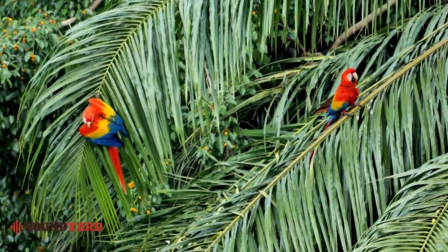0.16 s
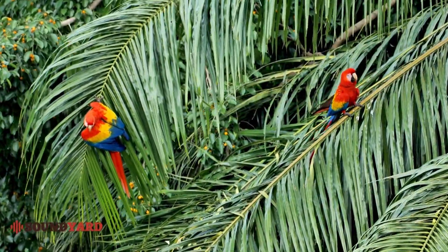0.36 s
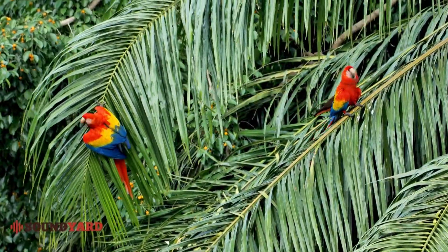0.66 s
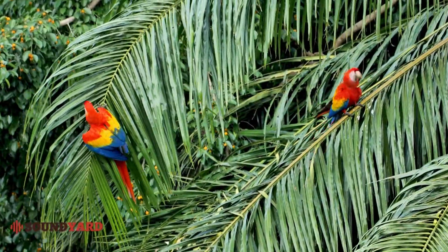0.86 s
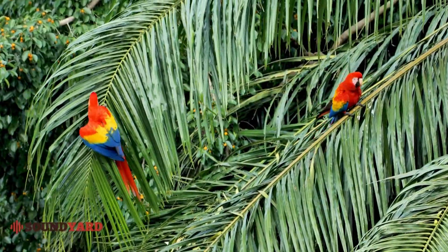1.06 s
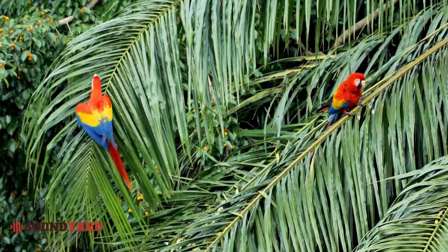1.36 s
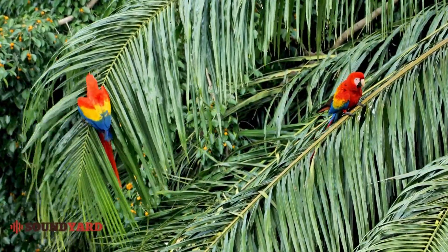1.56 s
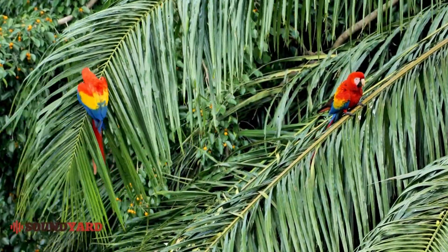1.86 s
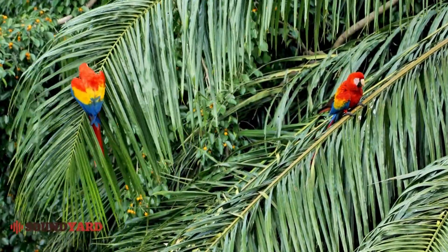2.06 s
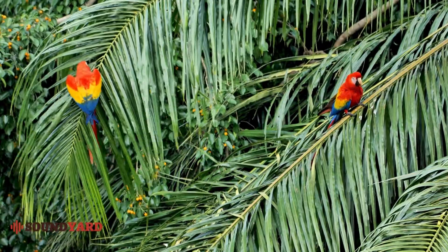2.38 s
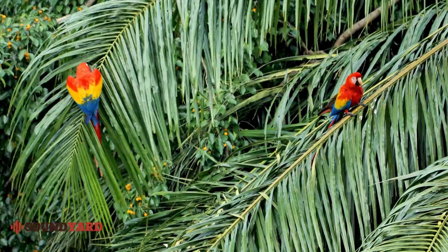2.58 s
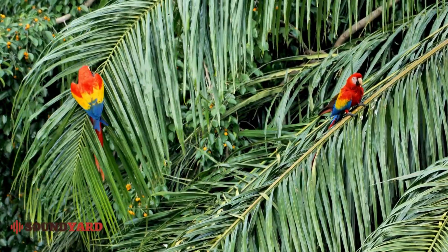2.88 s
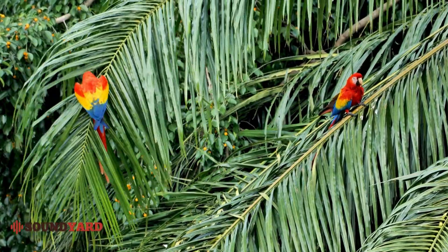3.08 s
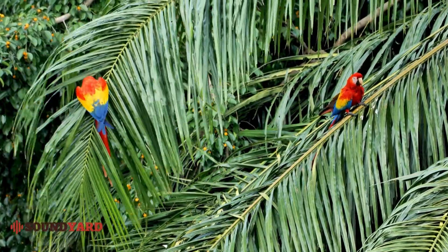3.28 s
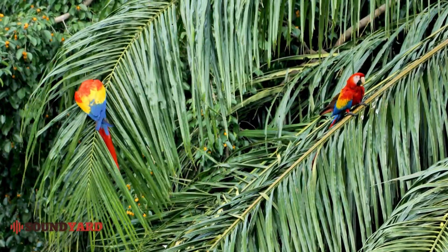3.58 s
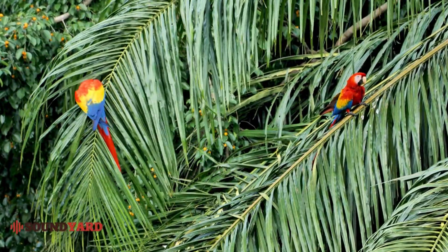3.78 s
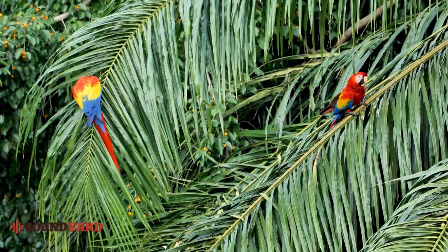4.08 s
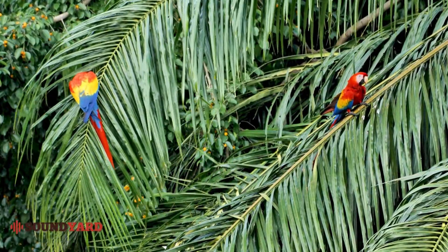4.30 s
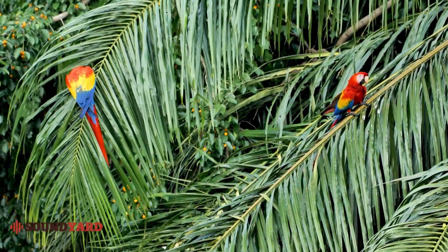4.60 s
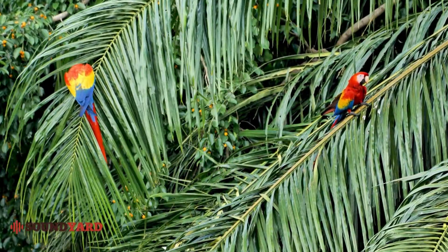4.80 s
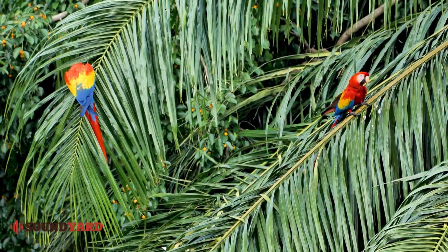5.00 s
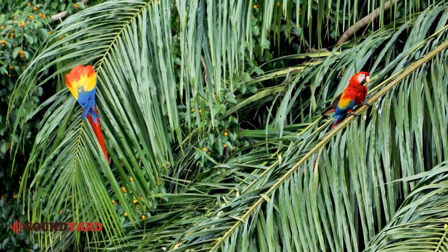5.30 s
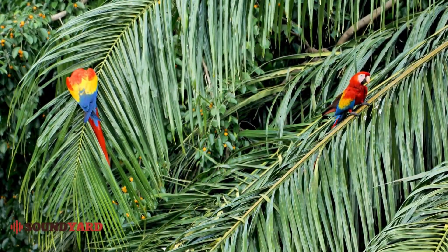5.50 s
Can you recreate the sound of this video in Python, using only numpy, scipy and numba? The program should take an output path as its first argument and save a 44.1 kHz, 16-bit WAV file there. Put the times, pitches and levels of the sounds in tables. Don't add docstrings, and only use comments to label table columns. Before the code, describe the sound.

Two macaws in a palm crown scream harsh, raspy squawks with creaky notes between, over forest air, rustling fronds and distant parakeet chatter.

```python
import sys
import numpy as np
from scipy import signal
from scipy.io import wavfile
from scipy.ndimage import uniform_filter1d, map_coordinates
from numba import njit

SR = 44100
rng = np.random.default_rng(int(sys.argv[2]) if len(sys.argv) > 2 else 0)


def store_wav(level_fs):
    pcm = np.round(np.clip(np.atleast_2d(level_fs), -1, 1) * 32767)
    wavfile.write(sys.argv[1], SR, pcm.T.astype(np.int16))


def field_ratio(decibels):
    return 10 ** (np.asarray(decibels, dtype=float) / 20)


N = 249165
LEFT_ONLY_DB = 6


def level(x, db):
    return x * field_ratio(db) / np.sqrt(np.mean(x ** 2))


def add(out, start, x):
    out[start:start + len(x)] += x[:N - start]


@njit
def svf(x, hz, width_hz):
    y, b, l = np.empty(len(x)), 0., 0.
    for i in range(len(x)):
        g, k = np.tan(np.pi * hz[i] / SR), width_hz / hz[i]
        v = (b + g * (x[i] - l)) / (1 + g * (g + k))
        b, l, y[i] = 2 * v - b, l + 2 * g * v, k * v
    return y


def band(x, hz, width_hz):
    return svf(x, np.clip(hz * np.ones(len(x)), 20, .45 * SR), max(float(width_hz), 10.))


def band2(x, hz, width_hz):
    return band(band(x, hz, width_hz), hz, width_hz)


def walk(rate_hz, size):
    k = max(int(SR / rate_hz), 1)
    held = np.repeat(rng.standard_normal(size // k + 1), k)
    return 1.3 * uniform_filter1d(uniform_filter1d(held, k), k)[:size]


def swells(peak_s, db, rise_db_per_s, fall_db_per_s):
    coarse = np.arange(0, N, 32)
    late_s = coarse / SR - np.reshape(peak_s, (-1, 1))
    slope = np.where(late_s < 0, np.reshape(rise_db_per_s, (-1, 1)), -np.reshape(fall_db_per_s, (-1, 1)))
    power = np.sum(field_ratio(np.reshape(db, (-1, 1)) + slope * late_s) ** 2, axis=0)
    return np.interp(np.arange(N), coarse, np.sqrt(power))


def effort(length_s, attack_s, release_s):
    t = np.arange(int(length_s * SR)) / SR
    return t, np.clip(np.minimum(t / attack_s, (length_s - t) / release_s), 0, 1)


@njit
def fire(hz, stretch, size):
    pulses, p, k = np.zeros(len(hz) + 1), .9, 0
    for i in range(len(hz)):
        step = hz[i] * stretch[k] / SR
        p += step
        if p >= 1:
            p, k = p - 1, k + 1
            pulses[i] += size[k] * p / step
            pulses[i + 1] += size[k] * (1 - p / step)
    return pulses[:-1]


def syrinx(hz, jitter, scatter_db):
    chance = rng.standard_normal((len(hz) // 8, 2)).T
    stretch = np.exp(np.clip(jitter * chance[0], -.7, .7))
    return fire(hz, stretch, field_ratio(scatter_db * np.clip(1.1 * chance[1], -3, 1.3)))


# f/Hz, density/dB per Hz
FOREST_AIR = [(59, -37), (100, -11.5), (347, -3), (420, 2), (477, -4), (1340, -6.5), (1800, -9), (2180, -9),
              (5400, -13), (8770, -19.5), (15500, -18.5)]
FOREST_DB = -46.5


def forest():
    out, swell = 0, walk(2.107, size=N)
    at_hz, per_hz_db = np.transpose(FOREST_AIR)
    for hz in 120 * 2 ** np.arange(0, 7.1, .5):
        db = np.interp(np.log(hz), np.log(at_hz), per_hz_db) + .8 * swell + 1.5 * walk(9, size=N)
        out = out + field_ratio(db) * band2(rng.standard_normal(N), hz, hz / 2)
    return level(out, FOREST_DB)


# peak t/s, level/dB
GUSTS = [(0., -54), (.31, -58.5), (.6, -64), (.9, -66), (1.18, -62), (1.451, -77), (1.9, -74), (3.01, -68),
         (3.3, -70), (3.6, -66.5), (3.81, -69), (4.17, -64), (4.4, -69.5), (4.92, -65.5), (5.16, -62),
         (5.38, -61.5)]
GUST_RISE_DB_PER_S, GUST_FALL_DB_PER_S, CALM_DB = 109.5, 94.5, -77.5


def wind():
    rumble = band(band(rng.standard_normal(N), 29.7, 57), 35, 69)
    gusts = swells(*np.transpose(GUSTS), GUST_RISE_DB_PER_S, GUST_FALL_DB_PER_S) + field_ratio(CALM_DB)
    return level(rumble, 0) * gusts * field_ratio(LEFT_ONLY_DB + 2 * walk(12, size=N))


# peak t/s, level/dB, centre f/Hz
SCREECHES = [(0., -35, 4650), (.162, -41.5, 4390), (.198, -42, 4380), (.342, -38, 4280), (.53, -42, 4480),
             (.56, -46, 4200), (.714, -38.5, 4430), (.79, -50.5, 4050), (2.25, -45.5, 4200),
             (2.335, -41.5, 4010), (2.39, -45.5, 4110), (2.44, -43, 4450), (2.491, -47, 4590),
             (2.625, -39, 4370), (2.77, -54, 4560), (2.88, -57.5, 4670), (3.15, -57.5, 3800)]
# start t/s, length/s, from f/Hz, to f/Hz, level/dB
CLEAR_NOTES = [(.001, .025, 5180, 5180, -36), (.002, .03, 1480, 1300, -51), (.003, .03, 2960, 2600, -52),
               (.135, .03, 2300, 2200, -55), (.15, .03, 4700, 4500, -45), (.165, .035, 1700, 1380, -52),
               (.17, .03, 3150, 2700, -51), (.32, .05, 4900, 5300, -43), (.33, .04, 4000, 3900, -44),
               (2.262, .04, 4950, 4700, -46), (2.28, .045, 4000, 4250, -45), (2.327, .04, 3650, 3850, -39),
               (2.375, .08, 3900, 4150, -42), (2.36, .075, 3000, 3120, -47), (2.42, .05, 5000, 4900, -47),
               (2.745, .032, 1680, 1730, -47)]
CHATTER_RISE_DB_PER_S, CHATTER_FALL_DB_PER_S = 282.5, 166


def parakeets():
    peak_s, peak_db, peak_hz = np.transpose(SCREECHES)
    centre_hz = np.interp(np.arange(N) / SR, peak_s, peak_hz)
    source = syrinx(1100 * (1 + .12 * walk(30, size=N)), jitter=.06, scatter_db=2)
    source = source * field_ratio(1.42 * walk(118.2, size=N))
    out = level(band(band2(source, centre_hz, 2770), centre_hz, 3800), -1.55)
    out = out * swells(peak_s, peak_db, CHATTER_RISE_DB_PER_S, CHATTER_FALL_DB_PER_S)
    for start_s, length_s, from_hz, to_hz, db in CLEAR_NOTES:
        size = int(length_s * SR)
        hz = np.linspace(from_hz, to_hz, size) * (1 + .008 * walk(150, size=size))
        swell = np.hanning(size) ** .3 * field_ratio(db - 2 + 2.5 * walk(80, size=size))
        add(out, int(start_s * SR), swell * np.sin(2 * np.pi * np.cumsum(hz) / SR))
    return out


# t/s, peak level/dB, f/Hz, width/Hz
FROND_TICKS = [(0.2912, -16, 1340, 1790), (.31, -21.5, 1270, 1500), (0.434, -32, 2600, 250),
               (0.498, -37, 2380, 222), (0.573, -42.5, 2303, 250), (0.64, -35, 2280, 299),
               (3.5504, -27.5, 4000, 7000), (3.749, -34, 8400, 1500), (3.88, -34, 5000, 1811),
               (4.165, -39, 110, 120), (5.373, -33, 91, 151), (.756, -17.5, 1500, 1500),
               (4.23, -30.5, 1450, 900), (5.078, -16, 2184, 3000), (4.343, -23.5, 2500, 4000)]
# peak t/s, level/dB, rise/dB per s, fall/dB per s
BRUSHES = [
    (.291, -43, 1500, 500),
    (0.334, -42, 181.5, 150),
    (.435, -49.5, 900, 600.5),
    (.64, -51.5, 299.5, 45.5),
    (2.605, -54, 899, 57.5),
    (3.42, -54.5, 120.5, 199.5),
]


def fronds():
    out = np.zeros(N)
    for start_s, db, hz, width_hz in FROND_TICKS:
        tick = band2(np.arange(2000) == 0, hz, width_hz)
        add(out, int(start_s * SR), field_ratio(db - LEFT_ONLY_DB) * tick / np.abs(tick).max())
    crackle = rng.standard_normal(N) * field_ratio(0.61 * rng.exponential(size=N))
    crackle = band(band(crackle, 2100, 1990), 1420, 2400)
    return out + level(crackle, 0) * swells(*np.transpose(BRUSHES))


# start t/s, length/s, attack/s, level/dB, drift over the call/dB
SQUAWK_CALLS = [
    (.748, 0.5807, 0.0578, -18, -2.5),
    (1.51, 0.586, 0.034, -22, -1.5),
    (4.328, 0.625, 0.0445, -14, -0.5),
    (5.23, 0.58, 0.0364, -17.5, -2.5),
]
# opening punch/dB, brightness/dB, top edge/dB
COLOURS = [
    (-9.5, 0, 1),
    (8, 3.5, 2.56),
    (-2, -0.73, 11.5),
    (0.76, 0.24, 0.68),
]
# f/Hz, width/Hz, level/dB
THROATS = [
    [(520.7, 120, -17.5), (1091.4, 483, -12.5), (1438, 287, -1.5), (2032, 419, -2.5), (2803, 426, -5),
     (3458, 480, -10), (3955, 248, -7.5), (4369, 531, -11.5), (5572, 890, -21), (7303, 1190, -29),
     (9365, 560, -38.5), (10460, 1080, -40.5), (12540, 2050, -44.5)],
    [(524.3, 70.6, -18), (1133.7, 358, -9), (1508.4, 208.6, -2), (2042, 350, -0.5), (2931, 610, -3.5),
     (3536, 350, -15), (4007, 670, -11), (5193, 770, -21), (6130, 457, -24), (7124, 385, -27.5),
     (8170, 880, -32), (10150, 990, -37.5), (11930, 840, -40.5)],
    [(525.6, 248, -14), (1152.7, 339.5, -6.5), (1607, 379, -0.5), (2175, 257, -2), (2880, 597, 0),
     (3605, 680, -11), (3926, 548, -1), (5000, 616, -19.5), (5477, 888, -12.5), (7860, 1210, -37.5),
     (8574, 940, -31.5), (10476, 2430, -40), (13800, 6600, -41.5)],
    [(552, 252, -16), (1104, 420, -10), (1542, 365, 2.5), (2220, 259, 2), (2600, 483, -2), (3177, 520, -2),
     (4066, 536, -3), (5000, 504, -12), (5735, 950, -12.5), (7635, 390, -25), (8524, 666, -24),
     (10270, 2200, -34), (13300, 6500, -35.5)],]
# delay/s, gain
FROND_ECHOES = [
    (.0099, 0.48),
    (0.0086, 0.426),
    (0.0082, 0.357),
    (.0074, 0.328),
]
# t/s, spread/s, level/dB
RASP_CRACKS = [
    (5.268, 0.0152, 6.5),
    (5.379, 0.0288, 10),
]
SYRINX_HZ, ATTACK_CURVE, RELEASE_S, PUNCH_S = 932.1, 1.16, 0.0482, 0.0757
TONGUE_DROP, SLACK_DULL_DB, BRIGHTEN_DB_PER_S = 0.1435, -5, 5.5
SLACK_TOP_DB, TOP_OPENS_S = -4, 0.0425


def squawk_source(size):
    source = syrinx(SYRINX_HZ * (1 + .05 * walk(40, size=size)), jitter=.17, scatter_db=2.8)
    source = level(source - source.mean(), 0) + field_ratio(-7) * rng.standard_normal(size)
    flutter = walk(200, size=size)
    return source * field_ratio(2.4 * np.clip(flutter - uniform_filter1d(flutter, size=1500), -3, 1))


def squawks():
    out = np.zeros(N)
    rows = zip(SQUAWK_CALLS, COLOURS, THROATS, FROND_ECHOES)
    for call, (punch_db, bright_db, top_db), throat, (lag_s, share) in rows:
        start_s, length_s, attack_s, db, drift_db = call
        t, push = effort(length_s, attack_s, RELEASE_S)
        size, start = len(t), int(start_s * SR)
        loud_db = db + drift_db * t / length_s + punch_db * np.exp(-t / PUNCH_S)
        loud = np.where(t < attack_s, push ** ATTACK_CURVE, push) * field_ratio(loud_db)
        tongue = 1 - TONGUE_DROP * (1 - push)
        sharpen_db = BRIGHTEN_DB_PER_S * t + SLACK_DULL_DB * (1 - push)
        rasp_db = sum(d * np.exp(-((start_s + t - at_s) / spread_s) ** 2)
                      for at_s, spread_s, d in RASP_CRACKS)
        opening_db = SLACK_TOP_DB * np.exp(-(t / TOP_OPENS_S) ** 2)
        source = squawk_source(size)
        voice = 0
        for k, (hz, width_hz, mode_db) in enumerate(throat):
            centre_hz = hz * (tongue if hz < 2400 else 1) + 45 * walk(16.6, size=size)
            mode = band2(source, centre_hz, 1.3 * width_hz)
            if hz > 6600:
                colour_db = sharpen_db + top_db + rasp_db + opening_db
            elif hz > 3300:
                colour_db = sharpen_db + bright_db
            else:
                colour_db = 0
            mode_gain = field_ratio(mode_db + colour_db + 0.98 * walk(12.57, size=size))
            voice = voice + (-1) ** k * mode_gain * mode
        voice = level(voice, 0) * loud
        add(out, start, voice)
        add(out, start + int(lag_s * SR), share * voice)
    return out


# start t/s, length/s, pulse rate f/Hz, first level/dB, last level/dB
CREAK_CALLS = [
    (1.327, 0.1925, 195.5, -31, -35),
    (4.228, 0.1125, 184.7, -46, -30.5),
    (4.945, 0.1184, 199.7, -32.5, -34.5),
    (5.072, 0.1752, 180.3, -30, -32),
]
# period spread, strength scatter/dB, second resonance f/Hz, its level/dB
MANNERS = [
    (.06, 1.8, 2400, -14),
    (.25, 3, 2400, -15),
    (.09, 2.5, 2450, -13),
    (.03, 1.5, 2450, -12),
]
# first f/Hz, last f/Hz
BEAKS_HZ = [
    (1400, 1583),
    (1450, 1473),
    (1450, 1462),
    (1600, 1558),
]
# f/Hz, width/Hz, level/dB
CREAK_MODES = [(3540, 880, -15.5), (4200, 110, -11.5), (4684, 1210, -17), (5970, 830, -35),
               (1045, 783, -19)]
CREAK_ATTACK_S, CREAK_RELEASE_S, CREAK_SAG_HZ_PER_S = 0.0083, 0.0345, 130
CREAK_CLICK_DB, CREAK_CHEST_DB, CREAK_AIR_DB = -22, -25.5, -14


def creaks():
    out = np.zeros(N)
    for call, (first_hz, last_hz), manner in zip(CREAK_CALLS, BEAKS_HZ, MANNERS):
        start_s, length_s, rate_hz, from_db, to_db = call
        jitter, scatter_db, second_hz, second_db = manner
        t, push = effort(length_s, CREAK_ATTACK_S, CREAK_RELEASE_S)
        size = len(t)
        source = level(syrinx(rate_hz - CREAK_SAG_HZ_PER_S * t, jitter, scatter_db), 0)
        source = source + field_ratio(-6) * rng.standard_normal(size)
        beak_hz = first_hz + (last_hz - first_hz) * np.sqrt(t / length_s)
        beak_hz = beak_hz * (1 + 0.0176 * walk(29.6, size=size))
        first = band(band(source, beak_hz, 140), beak_hz, 600)
        modes = [(second_hz, 400, second_db)] + CREAK_MODES
        upper = sum((-1) ** (k + 1) * field_ratio(db) * band2(source, hz, width_hz)
                    for k, (hz, width_hz, db) in enumerate(modes))
        upper = field_ratio(3.0) * band2(upper, 2890, 5000)
        click = field_ratio(CREAK_CLICK_DB) * band(band(source, beak_hz, 950), beak_hz, 1560)
        chest = field_ratio(CREAK_CHEST_DB) * band2(source, 450, 257)
        air = level(band(band(rng.standard_normal(size), 3530, 3000), 3950, 6400), CREAK_AIR_DB)
        voice = (first + upper + click + chest) / np.std(first) + air
        add(out, int(start_s * SR), voice * push * field_ratio(from_db + (to_db - from_db) * t / length_s))
    return out


LEAVES_T60_S, LEAVES_DB = .05, -13


def leaves(x):
    t = np.arange(int(LEAVES_T60_S * SR)) / SR
    scatter = rng.standard_normal(len(t)) * field_ratio(-60 * t / LEAVES_T60_S) * (t > .001)
    scatter = scatter * field_ratio(LEAVES_DB) / np.sqrt(np.sum(scatter ** 2))
    return x + signal.fftconvolve(x, scatter)[:N]


@njit
def trees(x, lags, gain, damp):
    line, soft, out = np.zeros((8, 8192)), np.zeros(8), np.zeros(len(x))
    for i in range(len(x)):
        total = 0.
        for k in range(8):
            soft[k] += (1 - damp) * (gain[k] * line[k, (i - lags[k]) & 8191] - soft[k])
            total += soft[k]
            out[i] += soft[k] * (1 - 2 * (k % 2))
        for k in range(8):
            line[k, i & 8191] = x[i] + soft[k] - total / 4
    return out


GAIN_START_DB, GAIN_REST_DB, GAIN_DB_PER_S_PER_DB = -4.5, -27, 0.3684


def gain(heard):
    heard_db = 10 * np.log10(uniform_filter1d(heard ** 2, 4096) + 1e-7)
    creep_db = GAIN_START_DB + np.cumsum(GAIN_DB_PER_S_PER_DB * (GAIN_REST_DB - heard_db)) / SR
    return field_ratio(creep_db - np.maximum(np.maximum.accumulate(creep_db), 0))


ECHO_T60_S, ECHO_DAMP, ECHO_DB, SWAY_S = 0.821, 0.113, -15.5, .0006


def scene():
    air, buffeting = forest(), wind()
    far = leaves(parakeets())
    near = leaves(fronds() + squawks() + creaks())
    lags = np.array([1031, 1523, 2129, 2797, 3571, 4409, 5347, 6421])
    sent = band(band(near, 3100, 9560), 3100, 10000) + field_ratio(4.5) * far
    echo = trees(sent, lags, field_ratio(-60 * lags / SR / ECHO_T60_S), ECHO_DAMP)
    echo = map_coordinates(echo, [np.arange(N) + SWAY_S * SR * walk(40, size=N)], mode="mirror")
    birds = field_ratio(LEFT_ONLY_DB) * (near + field_ratio(1) * far + field_ratio(ECHO_DB) * echo)
    left = birds + gain(birds + air) * air + buffeting
    return np.array([left, np.zeros(N)])


def band_limit(x):
    return signal.sosfilt(signal.butter(12, 15850, fs=SR, output="sos"), x)


def record(dry):
    ceiling, knee, hiss_db = .84, 7., -56.8
    excess = dry - dry / (1 + np.abs(dry / ceiling) ** knee) ** (1 / knee)
    excess = signal.sosfilt(signal.butter(1, 250, "high", fs=SR, output="sos"), excess)
    hiss = rng.standard_normal(dry.shape)
    hiss = signal.sosfilt(signal.butter(2, 200, "high", fs=SR, output="sos"), hiss)
    hiss = signal.lfilter([1, .15], [1], hiss)
    return band_limit(dry - excess + gain(dry[0]) * level(hiss, hiss_db))


dry = scene()
out = record(dry)
store_wav(out)
```